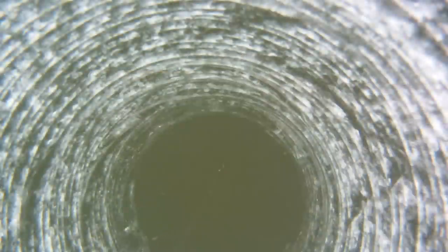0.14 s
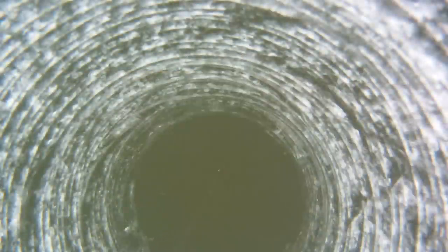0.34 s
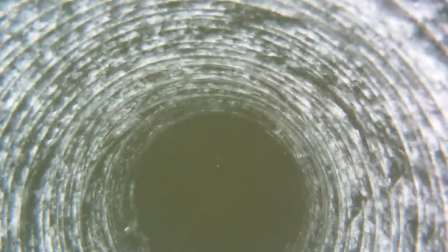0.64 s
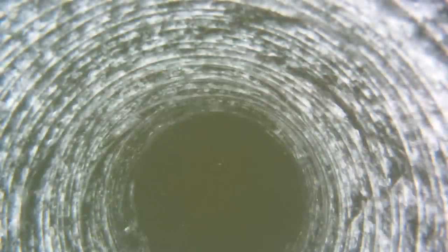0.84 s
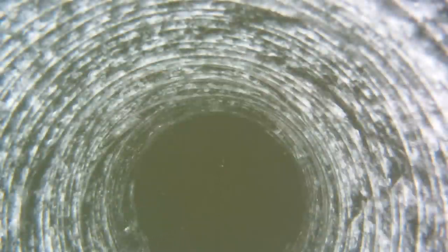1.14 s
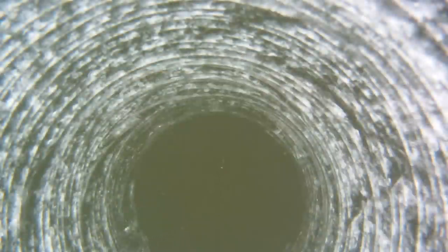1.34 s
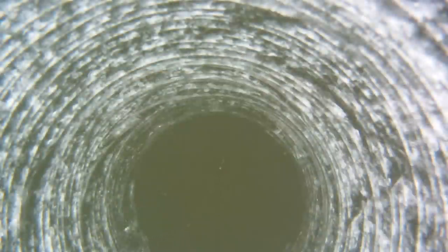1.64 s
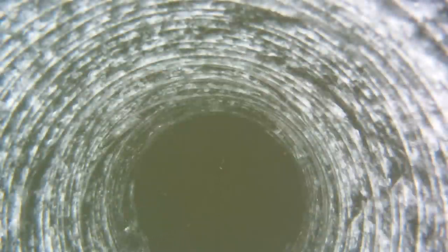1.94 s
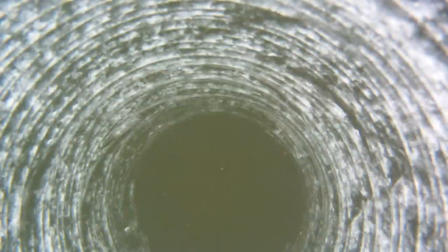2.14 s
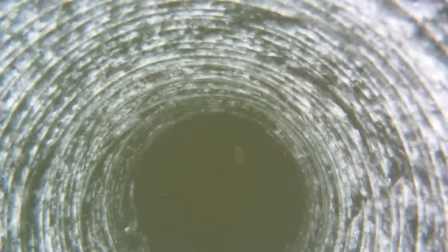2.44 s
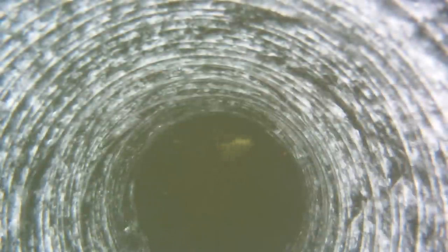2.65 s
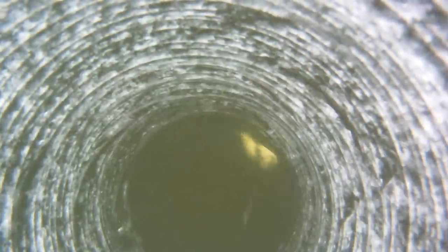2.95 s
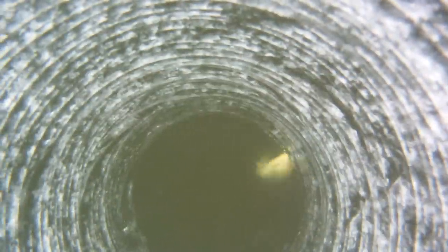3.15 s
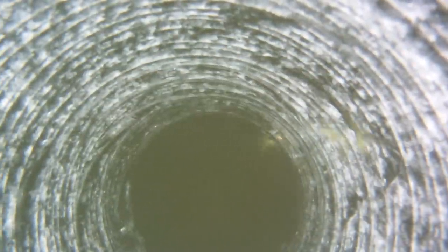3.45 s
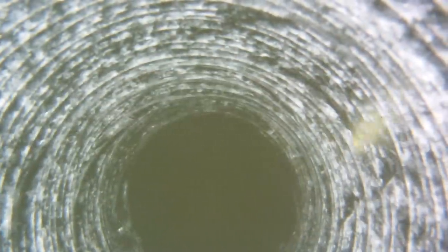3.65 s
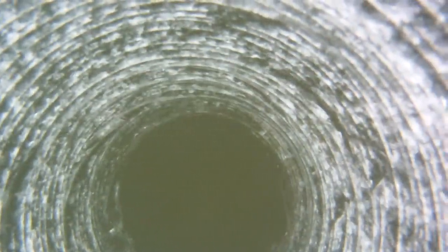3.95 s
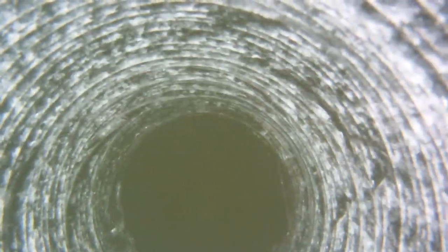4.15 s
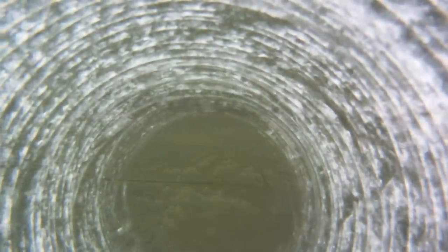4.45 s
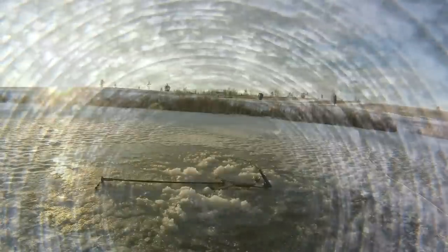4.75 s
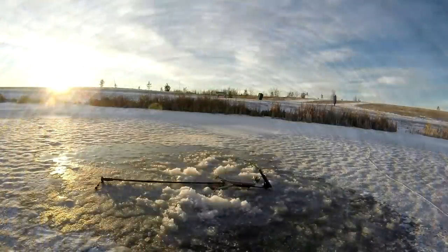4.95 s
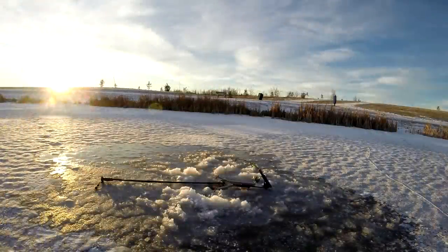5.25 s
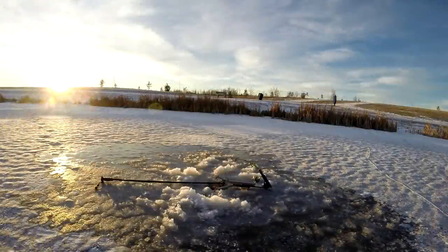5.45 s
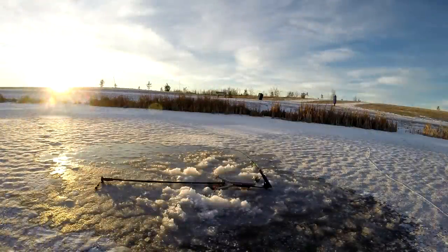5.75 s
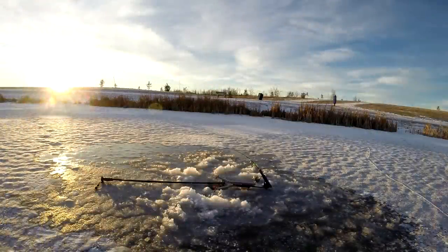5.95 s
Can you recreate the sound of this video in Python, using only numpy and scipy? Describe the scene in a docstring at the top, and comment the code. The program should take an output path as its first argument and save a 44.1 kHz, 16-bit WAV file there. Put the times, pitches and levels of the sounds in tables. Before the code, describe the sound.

A small, coarse microphone mounted on an ice-fishing rod picks up near silence, then cracking knocks, stick-slip scrapes, dull low thuds and a tinny, glassy bell as a fish tugs. It crossfades to a second microphone on a frozen pond, with soft low wind and faint high peeps, before a sharp bell clink and a rattling fall on ice, the bell fluttering on.

```python
"""An ice-fishing rod, jerked by a fish, knocks, scrapes and wobbles while its small bell jangles.
Coloured clicks make the knocks and the stick-slip drag; decaying sines make the wobble and the bell.
A little camera on the rod hears this through its coarse 12 kHz sampling.
The sound then dissolves to a second microphone out on the windy pond: shaped noise is the wind,
the rod clatters on the ice, the bell rings on, and a thin whine and two high peeps sit behind."""
import sys
import numpy as np
from scipy import signal
from scipy.fft import rfft, irfft
from scipy.io import wavfile
from scipy.ndimage import uniform_filter1d

SR = 44100
rng = np.random.default_rng(int(sys.argv[2]) if len(sys.argv) > 2 else 0)


def wav_out(sig):
    """Save sig, one row per channel (or a flat mono array), as 16-bit PCM at SR to the path in sys.argv[1]."""
    wavfile.write(sys.argv[1], SR, np.round(np.clip(np.atleast_2d(sig).T, -1, 1) * 32767).astype(np.int16))


N = 268561
TIME = np.arange(N) / SR

# the rod knocks on its stand and on the ice:
# (time [s], peak level [dB], centre of the colour [Hz], decay t60 [s])
ROD_KNOCKS = [(0.93, -64, 2300, 0.18), (1.535, -57.5, 970, .15), (2.0, -63, 2300, .12),
              (2.552, -11, 3630, 0.043), (2.589, -7.5, 2730, 0.015), (2.594, -9, 3400, 0.03),
              (2.627, -21.5, 1410, 0.054), (2.643, -25, 1740, 0.029), (2.712, -23, 2460, 0.09),
              (2.741, -11.5, 1470, 0.023), (2.745, -14.5, 1380, 0.026), (2.758, -13, 2780, 0.0045),
              (2.768, -20, 1640, 0.024), (2.810, -38, 4150, 0.01), (2.819, -35.5, 4100, 0.095),
              (2.891, -29, 2390, 0.0085), (2.931, -18, 2350, 0.0044), (2.959, -28, 700, 0.032),
              (2.982, -15.5, 1900, 0.012), (2.988, -26.5, 1680, 0.048), (3.022, -25.5, 2300, 0.025),
              (3.076, -23, 790, 0.023), (3.079, -20.5, 2470, 0.0071), (3.102, -15, 2570, 0.042),
              (3.108, -35, 3980, 0.023), (3.132, -20.5, 2020, 0.012), (3.305, -27, 2640, 0.025),
              (3.451, -35.5, 2170, 0.044), (3.480, -38, 2410, 0.017), (3.503, -30.5, 2220, 0.012),
              (3.617, -29, 2000, 0.016), (3.919, -27, 2700, 0.09), (3.954, -28.5, 2150, 0.063),
              (3.979, -30, 1130, 0.025), (4.075, -36, 705, 0.062), (4.112, -24.5, 1910, 0.017),
              (4.137, -25.5, 2000, 0.041), (4.276, -27.5, 2170, 0.0058), (4.352, -31.5, 2350, 0.03),
              (4.389, -29.5, 1500, 0.033), (4.413, -29, 2070, 0.072), (4.534, -36, 1800, 0.029),
              (4.696, -25, 1960, 0.016), (4.703, -21.5, 1680, 0.011), (4.835, -39, 1980, 0.02)]
# spectrum of a knock: (frequency [Hz], level [dB])
KNOCK_SPECTRUM = [(60, -12.5), (250, -14.5), (450, -26.5), (750, -10), (1020, -6.5), (1200, -7.5),
                  (1340, 0.5), (1520, -7.5), (2200, 5.5), (2750, -14), (3450, -5.5), (4400, -7.5),
                  (5100, -12.5), (6000, -8.5)]


def knocks():
    """Hard, short contacts that reach the camera mostly through the rod itself."""
    return blows(ROD_KNOCKS, KNOCK_SPECTRUM, tilt_db=6, focus_db=9.5,
                 tail_db=-49.0, tail_t60=0.031, scuff_db=-23.0, scuff_s=0.0062)


# what the rod rings with after any blow: (frequency [Hz], width [Hz], lift [dB])
ROD_RINGS = [(948, 30, 12.5), (1010, 36, 0), (1092, 31, -14), (1311, 59, 6.5), (1416, 37, 5.5),
             (1803, 130, -0.5), (2268, 61, 0), (2470, 30, -18), (3460, 52, 7), (3590, 68, 10.5)]


def blows(rows, spectrum, tilt_db, focus_db, tail_db, tail_t60, scuff_db, scuff_s, lead_s=.012):
    """Each blow is a short scuff, a crack of tiny contacts and a faint rattle; its centre sets its colour."""
    out = np.zeros(N)
    t = np.arange(SR // 4) / SR - lead_s
    after = np.maximum(t, 0)
    for s, db, hz, t60 in rows:
        scuff = amp(scuff_db) * np.exp(-abs(t) / scuff_s)
        crack_and_rattle = fade(after, t60) + amp(tail_db) * fade(after, tail_t60)
        shape = np.where(t < 0, scuff, crack_and_rattle)
        contacts = rng.choice([-1., 1.], len(t)) * shape
        # blows with a higher centre are tilted brighter
        blow = colour(contacts, spectrum, tilt_db * np.log2(hz / 2000), hz, focus_db)
        rings = sum(amp(lift) * resonate(blow, np.full(len(t), f), width) for f, width, lift in ROD_RINGS)
        blow = blow + rings
        peak = np.sqrt(uniform_filter1d(blow ** 2, size=128).max())
        add(out, s - lead_s, amp(db) * blow / peak)
    return out


# each tug drags the rod over the ice: (start [s], length [s], scrape level [dB],
# swell from start to end [dB], low grind level [dB], upper rasp against the middle ring [dB])
ROD_TUGS = [(2.535, .15, -27, -4, -45, 4), (2.696, 0.071, -24, 2, -48.5, 1),
            (2.783, .075, -50.5, 9, -68, 9), (2.893, 0.062, -33, -2, -37, -1),
            (2.979, 0.11, -38, -3, -44.5, -1), (3.111, 0.047, -31, -2, -42.5, -13),
            (3.16, 0.13, -35, 3.5, -53.5, -10), (3.353, 0.1, -44, 0, -56, 2.5),
            (3.478, 0.03, -46, 6, -51.5, -2), (3.523, 0.19, -39.5, -5.5, -52.5, 0.5),
            (3.731, 0.11, -42.5, -0.5, -50, 0), (3.857, 0.17, -34.5, 2, -44.5, 2),
            (4.042, 0.1, -36, 2.5, -42, 1), (4.176, 0.046, -41.5, 0, -45, 1.5),
            (4.244, 0.11, -38, 8.5, -44, 4), (4.377, 0.11, -38, -3, -47.5, 3),
            (4.515, 0.21, -45, -13, -53.5, 2)]
# spectra of the middle ring, upper rasp, lower grind and breaking crust: (frequency [Hz], level [dB])
RING_SPECTRUM = [(1100, -28), (1500, -10.5), (1900, -5.5), (2120, 9.5), (2400, 0.5), (2800, -5),
                 (4000, -22), (6000, -66.5)]
RASP_SPECTRUM = [(2000, -34.5), (2800, -41), (3100, -1), (3500, 6), (3880, 10), (4150, -4.5), (4500, 0.5),
                 (5000, -21), (6000, -20.5)]
GRIND_SPECTRUM = [(40, -12.5), (250, 0), (450, -11), (600, -2.5), (710, 6), (860, -8.5), (1080, 7),
                  (1200, -7.5), (1340, 5), (1600, -6.5), (2300, -35.5)]
CRUNCH_SPECTRUM = [(600, -25), (1000, -0.5), (1350, 4.5), (1700, -0.5), (2300, 9.5), (2750, 3),
                   (3450, 11.5), (4400, -4.5), (5100, -12.5), (6000, -11)]


def drag(slips_per_s=3200, spread_db=3.0, clump_db=2.5, clump_hz=170, hard_db=-31, grit_db=-12,
         squeak_hz=820, squeak_db=-7, glide=0.12):
    """Stick and slip: clumps of tiny clicks excite the rod's middle ring, an upper rasp and a lower grind."""
    sizes = amp(spread_db * np.minimum(rng.exponential(1, N), 4)) * rng.choice([-1., 1.], N)
    happens = rng.random(N) < slips_per_s / SR
    slips = sizes * happens * amp(clump_db * wander(clump_hz))
    ring = unit(colour(slips, RING_SPECTRUM))
    rasp = unit(colour(slips, RASP_SPECTRUM))
    grind = unit(colour(slips, GRIND_SPECTRUM))
    crunch = unit(colour(slips, CRUNCH_SPECTRUM))
    # the point of contact slides along the rod, so one low resonance glides about
    squeak = unit(resonate(slips, squeak_hz * np.exp(glide * wander(28)), width_hz=31))
    low = grind + amp(squeak_db) * squeak
    out = np.zeros(N)
    for start, length, db, swell_db, grind_db, bright_db in ROD_TUGS:
        strength = pull(start, length, swell_db)
        now = round(start * SR) + np.arange(len(strength))
        scrape = (ring[now] + amp(bright_db) * rasp[now]) / np.hypot(1, amp(bright_db))
        # there is always some grit; a hard pull breaks the crust, and the scrape widens to a crunch
        breaking = amp(grit_db) + amp(db - hard_db) * strength
        scrape = (scrape + breaking * crunch[now]) / np.hypot(1, breaking)
        add(out, start, strength * (amp(db) * scrape + amp(grind_db) * low[now]))
    return out


def pull(start, length, swell_db, grip_s=0.014, stop_t60=0.067):
    """One tug's strength: it grips, swells or sags evenly, and dies quickly when the pull ends."""
    t = np.arange(round((length + stop_t60 * 2) * SR)) / SR
    swell = amp(swell_db * (np.minimum(t / length, 1) - .5))
    return np.minimum(t / grip_s, 1) * swell * fade(np.maximum(t - length, 0), stop_t60)


# jolts that set the rod wobbling:
# (time [s], level [dB], slow bend against the hum [dB], dull thud against the hum [dB])
ROD_JOLTS = [(2.55, -56.5, 17, 19), (2.63, -45, 9, 8), (2.743, -29, -7.5, -1.5), (2.958, -38.5, 5, 11.5),
             (2.986, -38.5, 4, 13), (3.098, -36.5, -1, 3), (3.179, -40.5, 4, 20.5), (3.421, -43.5, -3, -6),
             (3.485, -37, -6.5, -2), (3.609, -45.5, -5, 8.5), (3.72, -46.5, 3, 4.5), (3.809, -39, -12, 6),
             (3.891, -37, -12, -19), (3.97, -32.5, -2, -13), (4.008, -24.5, -4, -0.5),
             (4.074, -30.5, -11, 4.5), (4.151, -35.5, -13, 6.5), (4.229, -34.5, 2, -15),
             (4.29, -30, 0.5, -17), (4.389, -40.5, 4, 5), (4.533, -35, -15, -1.5), (4.699, -25.5, -5, -3)]
# spectrum of the thud: (frequency [Hz], level [dB])
THUD_SPECTRUM = [(20, -29), (45, 5), (90, -2.5), (200, -1.5), (370, -5.5), (520, -14.5), (800, -23),
                 (2000, -63)]
# the rod's two low modes: (frequency [Hz], decay t60 [s])
BEND_MODE = (56.1, 0.33)
HUM_MODE = (248, 0.22)


def wobble(rise_s=0.0092, thud_t60=0.072):
    """A jolt rings the rod's slow bend and its hum, and thuds through the camera mount."""
    out = np.zeros(N)
    t = np.arange(SR // 2) / SR
    bend, hum = (np.sin(2 * np.pi * hz * t) * fade(t, t60) for hz, t60 in (BEND_MODE, HUM_MODE))
    rise = 1 - np.exp(-t / rise_s)
    for s, db, bend_db, thud_db in ROD_JOLTS:
        thud = unit(colour(rng.standard_normal(len(t)), THUD_SPECTRUM)) * fade(t, thud_t60)
        add(out, s, amp(db) * rise * (hum + amp(bend_db) * bend + amp(thud_db) * thud))
    return out


# clapper strikes, heard at the rod and then out on the pond: (time [s], level before the flutter [dB],
# share that rings on freely [0-1], lift of the modes between 4 and 4.5 kHz [dB])
NEAR_STRIKES = [(2.285, -58.5, 0, -6), (2.342, -52.5, 0, 5), (2.398, -63, .05, -2), (2.594, -12, 0, -3),
                (2.605, -22, 0.04, 0), (2.620, -13.5, 0.02, -12), (2.777, -31.5, 0.31, 5),
                (3.325, -50.5, 0.8, 5), (3.918, -25.5, 0, -15), (3.935, -33, 0.4, 8),
                (3.99, -31.5, 0.14, 1), (4.075, -42, 1, 6), (4.14, -26, 0.07, 6), (4.178, -23, 0.02, -1),
                (4.208, -36, 0, 7), (4.286, -28.5, 0.2, -3), (4.479, -28, 0, -6),
                (4.615, -24.5, 0.14, -4.5), (4.650, -28.5, 0.27, 4), (4.670, -30, 0.1, -16),
                (4.683, -36, 0, 3), (4.765, -40, 0, 4), (4.782, -44, 0.05, 0), (4.797, -36.5, 0, 2),
                (4.856, -36.5, 0.1, -1)]
FAR_STRIKES = [(5.732, -30, 0.076, 14), (5.737, -10, 0.11, 0), (5.764, -16, 0.21, -4),
               (5.856, -24.5, 0.29, -6), (5.866, -24, 0.29, 12), (5.880, -26, 0.36, 24),
               (5.898, -27, 0.24, -1), (5.936, -28.5, 0.14, 6), (5.968, -35, 0.33, 5),
               (5.994, -38.5, 0.21, -2), (6.043, -33, 0.28, 5)]


def near_bell():
    """The bell jangling beside the little camera."""
    return bell(NEAR_STRIKES, choke_t60=0.082) * flutter()


def far_bell():
    """The same bell from a few steps away."""
    return bell(FAR_STRIKES, choke_t60=0.084) * flutter()


# the bell's modes, the loudest so close together that they beat, and its overtones:
# (frequency [Hz], level [dB], decay t60 [s])
BELL_MODES = [(3350, -26, 0.51), (3500, -33, 0.62), (3876, -3.5, 0.27), (3885, -2.5, 0.22),
              (3910, -9.5, 0.85), (3690, -30, .25), (4100, -17, 0.31), (4100, -7.5, 0.45),
              (4000, -15, 0.91), (4430, -31, 0.38), (5340, -51, .6)]
BELL_OVERTONES = [(9470, -31, 0.45), (10150, -33, 0.43)]


def bell(strikes, choke_t60, swing=1.0, swing_hz=45, rise_s=0.0014, uneven_db=2.5):
    """The clapper rests on the rim and chokes most of each strike; the rest rings on, beats and flutters."""
    out = np.zeros(N)
    t = np.arange(SR // 2) / SR
    modes = BELL_MODES + BELL_OVERTONES
    hz, mode_db, _ = np.transpose(modes)
    rings = np.array([np.exp(2j * np.pi * f * t) * fade(t, t60) for f, _, t60 in modes])
    # the bell trembles on its spring, so each mode wavers in strength and phase, the high ones most
    knots = np.arange(0, .6, 1 / swing_hz)
    depth = swing * np.sqrt(hz / 4000)[:, None]
    upper = (hz > 4000) & (hz < 4500)
    for s, db, free, upper_db in strikes:
        # no two strikes share out their energy over the modes quite alike
        uneven = uneven_db * rng.standard_normal(len(hz))
        weights = amp(mode_db + upper_db * upper + uneven)
        tremble = rng.standard_normal((len(hz), len(knots), 2)) @ [1, 1j]
        tremble = (1 + depth * tremble * (knots > 0)) / np.sqrt(1 + depth ** 2)
        ring = sum(w * (r * np.interp(t, knots, z)).imag for w, r, z in zip(weights, rings, tremble))
        free = np.clip(free, 0, 1)
        shape = (free + (1 - free) * fade(t, choke_t60)) * (1 - np.exp(-t / rise_s))
        add(out, s, amp(db) * shape * ring / np.linalg.norm(weights))
    return out


def flutter(depth_db=4.0, rate_hz=90):
    """The bell rocks and rattles on its spring, so its ring comes and goes."""
    return amp(depth_db * np.clip(wander(rate_hz), -2, 1))


# the rod falls and skitters on the ice:
# (time [s], peak level [dB], centre of the colour [Hz], decay t60 [s])
ICE_CLATTER = [(5.068, -52, 5400, 0.04), (5.686, -26.5, 1660, 0.28), (5.694, -20.5, 2690, 0.062),
               (5.704, -21.5, 2430, 0.08), (5.742, -24, 1480, 0.12), (5.751, -23, 2300, 0.027),
               (5.765, -25, 1390, 0.053), (5.772, -22.5, 1480, 0.068), (5.786, -28.5, 1160, 0.13),
               (5.814, -32, 2300, 0.035), (5.839, -34, 1500, 0.13), (5.921, -29.5, 3830, 0.041),
               (5.962, -42, 4600, 0.033), (5.982, -42, 3500, 0.038)]
# spectrum of the clatter: (frequency [Hz], level [dB])
CLATTER_SPECTRUM = [(100, -25), (450, -11.5), (800, -6.5), (1120, 3), (1400, -1.5), (1800, -9), (2450, 3.5),
                    (2800, -7.5), (3280, -0.5), (4300, -6.5), (6950, -14), (7300, -31), (9600, -18.5),
                    (11200, -25.5), (15000, -36)]


def clatter():
    """The rod's blows on the ice, with a longer rattle behind each crack."""
    return blows(ICE_CLATTER, CLATTER_SPECTRUM, tilt_db=4.5, focus_db=3.5,
                 tail_db=-43, tail_t60=0.28, scuff_db=-14, scuff_s=0.005)


# faint high peeps out on the pond: (time [s], level of the fundamental [dB])
POND_PEEPS = [(4.885, -67), (5.223, -62.5)]


def peeps(hz=5290, length_s=0.038, octave_db=1):
    """Short, thin, high notes with a strong octave."""
    out = np.zeros(N)
    t = np.arange(round(length_s * SR)) / SR
    phase = 2 * np.pi * hz * t
    note = np.sin(np.pi * t / length_s) * (np.sin(phase) + amp(octave_db) * np.sin(2 * phase))
    for s, db in POND_PEEPS:
        add(out, s, amp(db) * note)
    return out


def whine(hz=4750, level_db=-61, throb_hz=29.8, octave_db=-9):
    """A faint electronic whine: a thin tone and its octave, in quick throbs."""
    throb = (.5 + .5 * np.cos(2 * np.pi * throb_hz * TIME)) ** 2
    phase = 2 * np.pi * hz * TIME + wander(60)
    return amp(level_db) * throb * (np.sin(phase) + amp(octave_db) * np.sin(2 * phase))


# spectrum of the little camera's own noise: (frequency [Hz], level [dB per Hz])
HISS_SPECTRUM = [(15, -26), (25, -6), (59, -2.5), (313, -6), (392, -9.5), (429, -7), (738, -11),
                 (968, -11.5), (1160, -13.5), (2280, -16), (5500, -20), (7150, -34), (12100, -120)]


def hiss(level_db=-63.5):
    """The little camera's own noise, as steady coloured noise."""
    return amp(level_db) * unit(colour(rng.standard_normal(N), HISS_SPECTRUM))


# spectrum of the open air: (frequency [Hz], level [dB per Hz])
WIND_SPECTRUM = [(15, -29), (25, -3), (84, -1), (281, -13), (322, -10.5), (421, -21), (741, -10.5),
                 (970, -14), (1380, -30), (4380, -38.5), (4750, -36), (6550, -42.5), (7910, -40.5),
                 (14300, -53.5), (15500, -48)]


def wind(level_db=-41.5, gust_db=0.6, gust_hz=9):
    """Wind over the ice: coloured noise whose level wavers slightly with the gusts."""
    air = unit(colour(rng.standard_normal(N), WIND_SPECTRUM))
    return air * amp(level_db + gust_db * wander(gust_hz))


# the little camera fades out: (time [s], level [dB])
CAMERA_FADE = [(4.7, -0.5), (4.85, -11), (5.0, -37), (5.1, -70)]


def on_the_rod():
    """What the little camera hears, mostly through the rod itself."""
    heard = hiss() + knocks() + drag() + wobble() + near_bell()
    return sample_and_hold(heard) * amp(curve(CAMERA_FADE))


def sample_and_hold(x, guard_hz=5700, hold_hz=12000):
    """Holding each 12 kHz sample mirrors the sound around 6 kHz: every ring gets a glassy twin above it."""
    mirrored = low_pass(x, guard_hz, size=161) * (1 + 2 * np.cos(2 * np.pi * hold_hz * TIME))
    hold_response = np.sinc(np.fft.rfftfreq(N, 1 / SR) / hold_hz)
    return irfft(rfft(mirrored) * hold_response, N)


# the air and the whine swell up: (time [s], level [dB])
POND_SWELL = [(4.45, -40), (4.65, -10), (4.8, -4.5), (5.0, -1), (5.3, 1), (5.6, 0), (6.09, 1)]


def on_the_pond():
    """Wind over the ice, the rod's clatter and the bell from a few steps away."""
    background = (wind() + whine()) * amp(curve(POND_SWELL))
    return background + clatter() + far_bell() + peeps()


def amp(db):
    """Decibels to gain."""
    return 10 ** (np.asarray(db) / 20)


def unit(x):
    """Scales to rms 1."""
    return x / np.sqrt(np.mean(x ** 2) + 1e-20)


def fade(t, t60):
    """Exponential decay, 60 dB in t60 (1 ms at least)."""
    return np.exp(-np.log(1000) * t / max(t60, 1e-3))


def curve(rows):
    """A curve of (time [s], value) rows at every sample."""
    return np.interp(TIME, *np.transpose(rows))


def add(mix, s, sound):
    """Mixes a sound in at time s."""
    part = mix[round(s * SR):][:len(sound)]
    part += sound[:len(part)]


def colour(x, points, tilt_db=0, focus_hz=2000, focus_db=0, focus_octaves=0.21, size=4096):
    """Causal filter with the given spectrum, a tilt in dB per octave and one favoured resonance."""
    octave = np.log2(np.fft.rfftfreq(size, 1 / SR) + 1)
    hz, db = np.transpose(points)
    db = np.interp(octave, np.log2(hz), db)
    # the tilt pivots at 2 kHz and levels off 1.5 octaves away
    db = db + tilt_db * np.clip(octave - np.log2(2000), -1.5, 1.5)
    db = db + focus_db * np.exp(-((octave - np.log2(focus_hz)) / focus_octaves) ** 2)
    # folding the cepstrum forward gives minimum phase, so nothing sounds early
    cepstrum = irfft(np.log(amp(db)))
    cepstrum[1:size // 2] *= 2
    cepstrum[size // 2 + 1:] = 0
    return signal.fftconvolve(x, irfft(np.exp(rfft(cepstrum))))[:len(x)]


def resonate(x, hz, width_hz):
    """A resonance that follows the curve hz."""
    turn = np.exp(2j * np.pi * np.cumsum(hz) / SR)
    r = np.exp(-np.pi * width_hz / SR)
    return (turn * signal.lfilter([1 - r], [1, -r], x / turn)).real


def low_pass(x, hz, size):
    """Steep low-pass without delay."""
    return signal.oaconvolve(x, signal.firwin(size, hz, window=("kaiser", 9), fs=SR), "same")


def wander(rate_hz):
    """Slow chance of rms 1, up to the given rate."""
    slow = np.fft.rfftfreq(N, 1 / SR) < rate_hz
    return unit(irfft(rfft(rng.standard_normal(N)) * slow, N))


def scene():
    """Both viewpoints in one channel."""
    return (on_the_rod() + on_the_pond())[None]


def record(dry, edge_hz=15500):
    """Limits the band: a steep low-pass takes off the top treble."""
    return low_pass(dry[0], edge_hz, size=201)[None]


dry = scene()
out = record(dry)
wav_out(out)
```